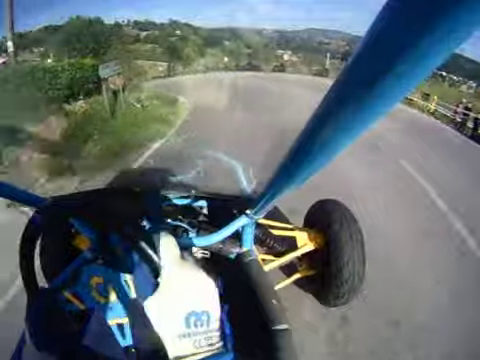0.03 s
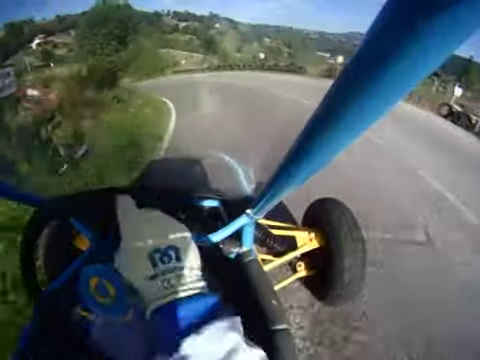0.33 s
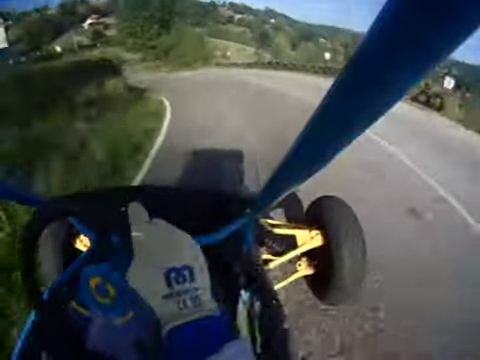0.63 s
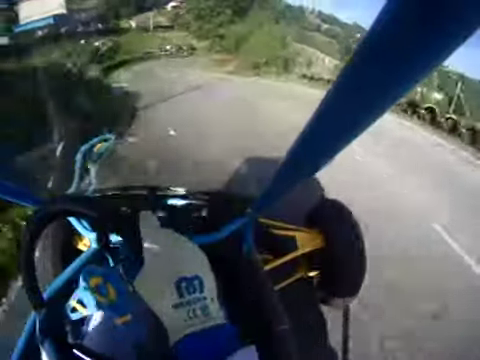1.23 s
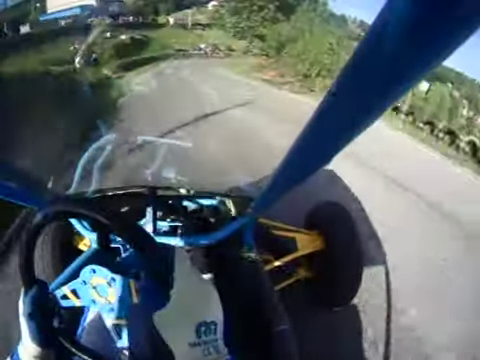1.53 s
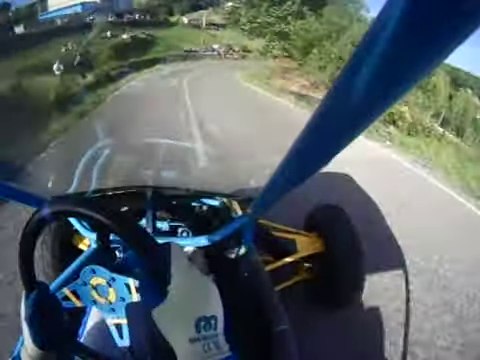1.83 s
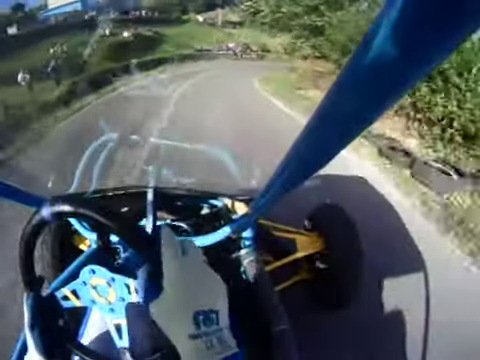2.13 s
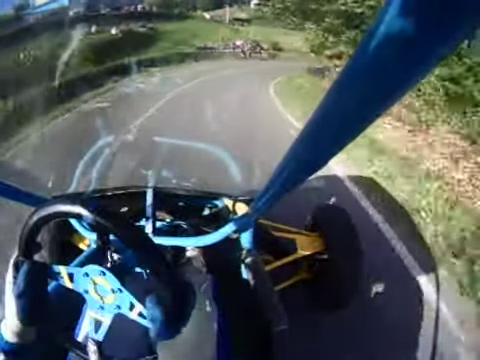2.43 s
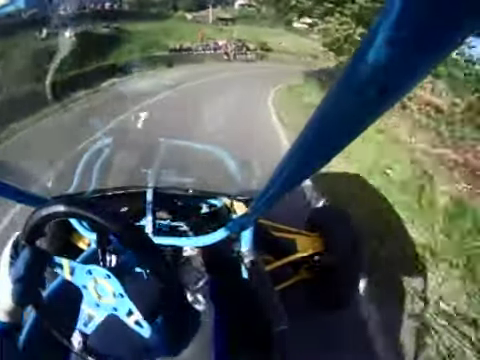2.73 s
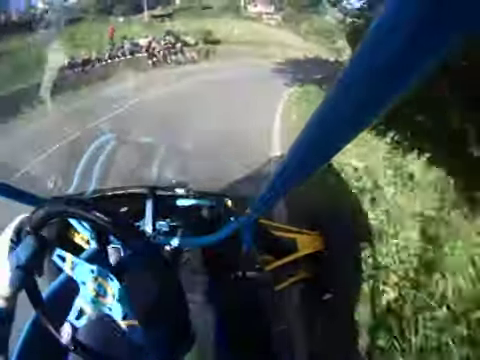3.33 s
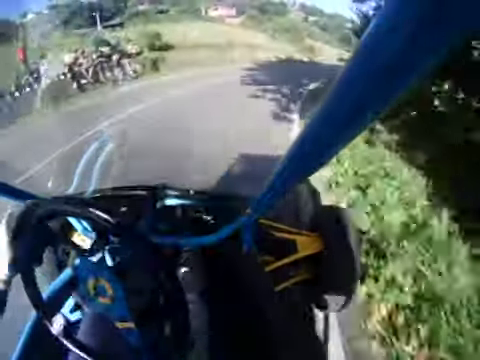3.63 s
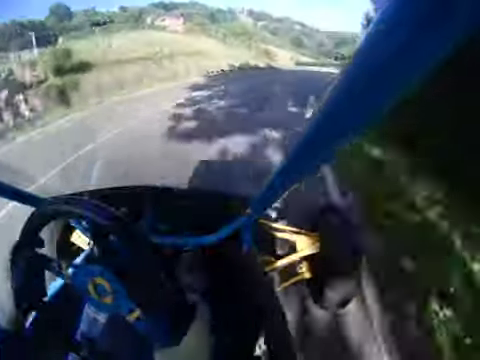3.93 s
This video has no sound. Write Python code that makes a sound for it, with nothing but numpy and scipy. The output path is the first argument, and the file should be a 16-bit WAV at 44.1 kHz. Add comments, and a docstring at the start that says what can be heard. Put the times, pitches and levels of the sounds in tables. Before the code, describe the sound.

A gravity racer rumbles over asphalt, heard dully from on board with tyre roar, wind buffeting, ticking grit and rattling fittings. At about 0.4 seconds a hard bump booms loudly, with a brief crackle at 0.5. Smaller jolts follow until 2 seconds. From 2.4 the ride turns quieter and a faint tyre hum swells and fades, before a gust, bumps and rattles return around 3.3 to 3.6 seconds.

```python
"""A paved hill road, heard from on board a gravity racer rolling fast downhill.
Rough asphalt shakes the chassis into a boom near 90 Hz, and the tyres roar through the bodywork.
Wind buffets the microphone, grit ticks on the body and loose fittings rattle on the bumps.
The hardest bump overloads the small, dull recorder, which crackles.
Later, on a smooth stretch, a faint tyre hum swells and fades."""
import sys
import numpy as np
from scipy import signal
from scipy.fft import rfft, irfft
from scipy.io import wavfile
from scipy.ndimage import uniform_filter1d

SR = 44100
rng = np.random.default_rng(int(sys.argv[2]) if len(sys.argv) > 2 else 0)


def store_wav(level_fs):
    """Save 16-bit WAV to argv[1]."""
    pcm = np.round(np.clip(np.atleast_2d(level_fs), -1, 1) * 32767)
    wavfile.write(sys.argv[1], SR, pcm.T.astype(np.int16))


N = 176400
TIME = np.arange(N) / SR

# how hard the road shakes the chassis: (time [s], relative level [dB])
SHAKE_LEVEL = [(0,-16),(.16,-20.5),(.39,-19.5),(.415,-3),(.555,-6.5),(.6,-21),(.72,-15),(.78,-8),(.83,-18),(.9,-16),(1.0,-20.5),(1.48,-22.5),(1.53,-14),(1.67,-22),(1.79,-13.5),(1.95,-20.5),(2.18,-20.5),(2.26,-29),(2.5,-40.5),(2.69,-26.5),(2.8,-41),(3.0,-28),(3.19,-28.5),(3.39,-15.5),(3.46,-31),(3.54,-18),(3.68,-24),(4,-28.5)]
# pitch curve of the chassis boom: (time [s], pitch [Hz])
BOOM_PITCH = [(0.0, 89), (0.12, 86.6), (0.23, 94.43), (0.41, 86.22), (1.04, 93.94), (1.09, 84.3),
              (1.36, 88.65), (1.41, 98.9), (1.53, 90.23), (1.94, 86.46), (2.02, 97.5), (2.34, 88.2),
              (2.57, 104.7), (2.72, 92.95), (3.29, 89.6), (3.48, 98.1), (3.77, 90.35), (4.0, 94.8)]
# chassis resonances above the boom: (pitch [Hz], width [Hz], relative level [dB])
UPPER_MODES = [(115.2, 14, -16.5), (151.9, 21, -24.5)]
# rolling envelope shared by tyre roar, air rush and grit: (time [s], relative level [dB])
ROLL_LEVEL = [(0,-35),(.18,-41),(.39,-39.5),(.43,-27),(.53,-26),(.61,-35),(.76,-34.5),(.97,-35.5),(1.25,-42),(1.43,-40),(1.55,-35.5),(1.92,-40),(2.12,-37.5),(2.55,-43.5),(3.15,-41.5),(3.44,-36),(3.66,-41),(4,-42.5)]
# brightness of the tyre roar: (time [s], treble gain [dB])
ROAR_TREBLE = [(0,-1.5),(.7,-2.5),(.97,3.5),(1.3,-0.5),(2.2,-2),(2.55,-12.5),(3.1,-4.5),(3.45,0),(4,-7)]
# bodywork resonances: (pitch [Hz], width [Hz], gain for roar [dB], gain for rattles and grit [dB])
BODY_MODES = [(282.5,75,-6,-14),(383.5,60,-11,-14),(552.8,56,-6.5,-3.5),(639.4,77,-10.5,-9),(982,92,-15,-9.5),(1154,100,-11.5,-18.5),(1480,190,-11,-7.5),(1746,140,-13,-9),(2148,190,-12,-6.5),(2429,150,-10.5,-4),(2676,170,-12.5,-11),(2870,140,-14.5,-16.5),(3156,190,-15,-14.5),(3542,190,-14,-13)]
# envelope of the wind buffeting: (time [s], level [dB])
GUST_LEVEL = [(0,-33.5),(.33,-29.5),(.47,-21.5),(.85,-29.5),(1.05,-35.5),(1.45,-30.5),(1.75,-29),(2.05,-25.5),(2.4,-40.5),(2.7,-39),(3.15,-40.5),(3.33,-21.5),(3.6,-35.5),(4,-29.5)]
# colour of the low buffeting: (frequency [Hz], relative level [dB])
BUFFET_COLOUR = [(12,6),(25,-9.5),(45,3.5),(62,-0.5),(85,1.5),(130,-13),(220,-40.5)]
# colour of the rushing air: (frequency [Hz], relative level [dB])
RUSH_COLOUR = [(200,-6),(450,11.5),(850,6),(1500,2.5),(2400,5.5),(3200,-9.5),(4200,-3.5)]
# rattle cues for the loose fittings: (time [s], length [s], relative level [dB], brightest pitch [Hz])
RATTLE_CUES = [(0.085,0.049,-31.5,2000),(0.236,0.0037,-40,1900),(0.33,0.014,-31.5,1170),(0.405,.02,-31.5,1690),(0.463,0.024,-33,2260),(0.508,.045,-36,2170),(.562,.02,-28,2380),(0.657,.012,-31.5,2375),(0.729,.03,-30.5,702),(0.849,.015,-44.5,2346),(0.941,.055,-36.5,3400),(1.154,0.0098,-38,2470),(1.645,0.033,-33.5,1840),(2.024,.02,-33.5,2742),(2.097,0.018,-31,910),(2.32,.02,-34,2840),(2.401,.006,-37,2320),(2.412,0.011,-31,1930),(2.469,.008,-39.5,2500),(3.212,.008,-36.5,2500),(3.262,0.0062,-36,2530),(3.294,.009,-34.5,1600),(3.382,0.011,-29.5,2290),(3.406,.008,-33.5,2240),(3.423,0.023,-29,3620),(3.454,0.013,-32.5,2490),(3.509,0.03,-34,2800),(3.627,.02,-37.5,1780)]
# overload snaps: (time [s], length [s], height [linear], pitch [Hz], low-pass cutoff [Hz])
CRACKLE_CUES = [(0.5082,.0006,0.76,800,3200),(.5140,.00115,0.65,2300,4500),(0.5332,.0002,0.55,2400,3260)]
# tyre tones on the smooth stretch: (pitch [Hz], width [Hz], level [dB])
HUM_TONES = [(153, 8.5, -46), (298, 14, -52.5), (347.4, 8.7, -53.5), (387, 20, -53.5)]


def from_db(db):
    """Decibels to gain."""
    return 10 ** (np.asarray(db) / 20)


def rms_one(x):
    """Scale to an rms of 1."""
    return x / np.sqrt(np.mean(x ** 2) + 1e-20)


def curve(rows):
    """An automation curve: (time, value) points joined by straight lines."""
    return np.interp(TIME, *np.transpose(rows))


def drift(rate_hz):
    """Smooth random modulation with a spread of 1."""
    step, run_in = 20, 2000  # samples per control point; points left to settle
    pole = np.exp(-2 * np.pi * step * rate_hz / SR)
    noise = rng.standard_normal(N // step + run_in + 2)
    slow = signal.lfilter([1], [1, -2 * pole, pole * pole], noise)[run_in:]
    return np.interp(np.arange(N) / step, np.arange(len(slow)), rms_one(slow))


def filtered(x, hz, kind, order=2):
    """A low-, high- or band-pass with a flat passband."""
    return signal.sosfilt(signal.butter(order, hz, kind, fs=SR, output="sos"), x + 1e-18)


def resonate(x, hz, width):
    """One resonance with steep skirts; white input keeps its power."""
    edges = [max(hz - width / 2, 10), hz + width / 2]
    return filtered(x, edges, "band") * np.sqrt(SR / 2 / width)


def ringing_noise(hz, width):
    """A resonance kept ringing by random pushes; rms 1."""
    return rms_one(resonate(rng.standard_normal(N + SR // 2), hz, width)[SR // 2:])


def coloured_noise(colour):
    """Noise shaped by an EQ curve, rolling off beyond its ends; rms 1."""
    hz, db = np.transpose(colour)
    bins = np.maximum(np.arange(N // 2 + 1) * SR / N, 1)
    eq = from_db(np.interp(np.log(bins), np.log(hz), db))
    roll_off = np.minimum(1, np.minimum(bins / hz[0], hz[-1] / bins)) ** 2
    return rms_one(irfft(rfft(rng.standard_normal(N)) * eq * roll_off, N))


def impacts(per_s, spread_db):
    """Randomly timed clicks of uneven strength; rms 1."""
    hits = rng.random(N) < per_s / SR
    return rms_one(hits * from_db(spread_db * rng.standard_normal(N)))


def chassis_boom():
    """The chassis booms; recorder distortion adds an octave overtone when it is loud."""
    wander_hz, looseness, distortion_amount = 1.99, 0.39, 0.25
    trim_db, flutter_db = -1.5, 1.45
    phase = 2 * np.pi * np.cumsum(curve(BOOM_PITCH) + wander_hz * drift(10)) / SR
    # the swing wobbles in both size and phase
    wobble = (1 + looseness * (drift(9.9) + 1j * drift(13))) / np.sqrt(1 + 2 * looseness ** 2)
    shake_db = curve(SHAKE_LEVEL)
    envelope = from_db(shake_db + trim_db + flutter_db * drift(8.2))
    boom = np.sqrt(2) * np.real(wobble * np.exp(1j * phase)) * envelope
    overtone = filtered(boom ** 2, 120, "high")
    upper = sum(from_db(db) * ringing_noise(hz, width) for hz, width, db in UPPER_MODES)
    rest_db, follow = -20, 0.54  # the upper modes ride about half of the shake's dB swing
    upper_gain = from_db(rest_db + follow * (shake_db - rest_db))
    return boom + distortion_amount * overtone + upper * upper_gain


def tyre_roar():
    """Gritty asphalt drives the bodywork resonances, coarser and smoother by patches."""
    trim_db, patch_db, grain_db, flicker_db = -4, 1.06, 2, 0.96
    treble_from_hz = 2850
    road = from_db(curve(ROLL_LEVEL) + trim_db + patch_db * drift(14) + grain_db * drift(180))
    treble_db = curve(ROAR_TREBLE)
    roar = np.zeros(N)
    for hz, width, db, _ in BODY_MODES:
        band = resonate(road * rng.standard_normal(N), hz, width)
        roar += band * from_db(db + flicker_db * drift(12) + treble_db * (hz > treble_from_hz))
    return roar


def wind():
    """Air hits the microphone: lumpy low buffeting under a smooth rush."""
    lump_db, rush_trim_db = 2, -9.5
    buffet = coloured_noise(BUFFET_COLOUR) * from_db(curve(GUST_LEVEL) + lump_db * drift(8))
    rush = coloured_noise(RUSH_COLOUR) * from_db(curve(ROLL_LEVEL) + rush_trim_db)
    return buffet + rush


def grit_ticks():
    """Loose grit strikes the bodywork at random, each tick ringing with its own colour."""
    trim_db = -12.5
    ticks = impacts(per_s=180, spread_db=1.5) * from_db(curve(ROLL_LEVEL) + trim_db)
    return sum(from_db(db) * resonate(ticks * rng.standard_normal(N), hz, width)
               for hz, width, _, db in BODY_MODES)


def fitting_rattles():
    """Each bump sets loose fittings chattering on the bodywork in a short, dense burst."""
    attack_s, release_s, focus_db_per_octave = 0.0017, 0.006, 10
    start, length, level_db, bright_hz = np.transpose(RATTLE_CUES)[:, :, None]
    attack = np.clip((TIME - start) / attack_s + 1, 0, 1)
    tail_age = TIME - start - length / 2
    envelopes = attack * np.exp(-np.clip(tail_age / (release_s + length / 10), 0, 20))
    contacts = impacts(per_s=1600, spread_db=2)
    rattle = np.zeros(N)
    for hz, width, _, db in BODY_MODES:
        octaves_away = np.abs(np.log2(hz / bright_hz))
        strength = from_db(level_db + db - focus_db_per_octave * octaves_away)
        force = (strength * envelopes).sum(0) * contacts
        rattle += resonate(force * rng.choice([-1, 1], N), hz, width)
    return rattle


def limiter(x):
    """Loud peaks duck the gain, which then recovers steadily."""
    threshold_db, release_db_per_s = -5.5, 88
    recovery_db = release_db_per_s * TIME
    over_db = np.maximum(20 * np.log10(np.abs(x) + 1e-9) - threshold_db, 0)
    duck_db = np.maximum.accumulate(over_db + recovery_db, axis=-1) - recovery_db
    return x * from_db(-uniform_filter1d(duck_db, size=300, axis=-1))


def overload_crackles(mix):
    """Square-edged snaps, cued on the hardest bump, kick against the swing of the mix."""
    snaps = np.zeros(N)
    for start, length, height, hz, cutoff_hz in CRACKLE_CUES:
        age = TIME - start
        gate = (age >= 0) & (age < length)
        square = age * hz % 1 < 0.5
        snaps += filtered(height * gate * square, cutoff_hz, "low")
    polarity = np.tanh(mix / 0.02)
    return -snaps * polarity


def tyre_hum():
    """The tyres sing a few narrow tones that swell and fade on the smooth stretch."""
    start_s, end_s, fade_s = 2.39, 3.5, 0.31
    swell = np.clip(np.minimum(TIME - start_s, end_s - TIME) / fade_s, 0, 1)
    return swell * sum(from_db(db) * ringing_noise(hz, width) for hz, width, db in HUM_TONES)


def scene():
    """All layers meet in mono at the on-board microphone."""
    return (chassis_boom() + tyre_roar() + wind() + grit_ticks() + fitting_rattles() + tyre_hum())[None]


def record(dry):
    """The recorder holds down peaks, dulls the top above 4 kHz and crackles on the hardest bump."""
    microphone_top_hz, crackle_top_hz = 3954, 16000
    dull = filtered(limiter(dry), microphone_top_hz, "low", order=20)
    high_cut = signal.cheby2(12, 70, crackle_top_hz, fs=SR, output="sos")
    return signal.sosfilt(high_cut, dull + overload_crackles(dull))


dry = scene()
out = record(dry)
store_wav(out)
```